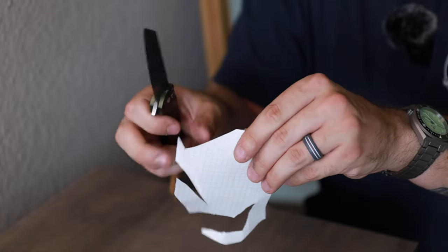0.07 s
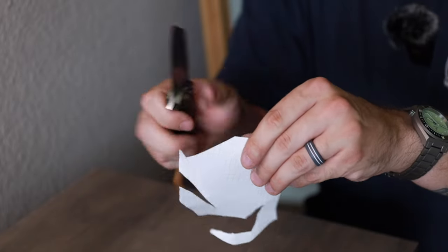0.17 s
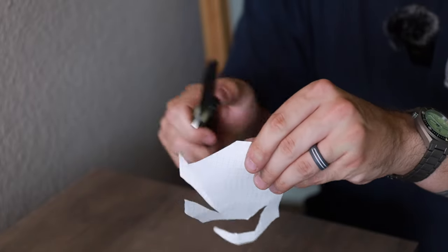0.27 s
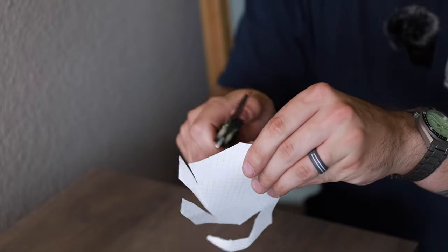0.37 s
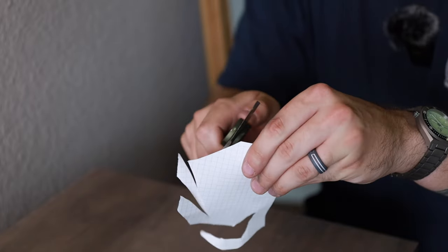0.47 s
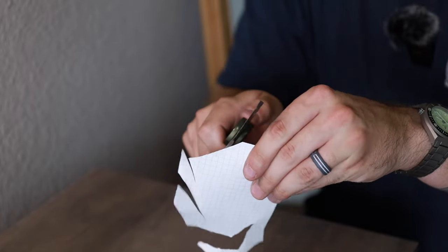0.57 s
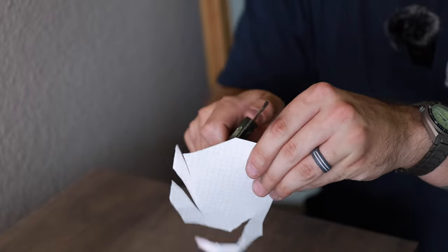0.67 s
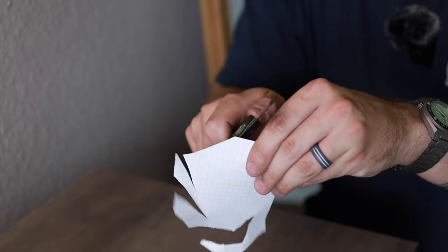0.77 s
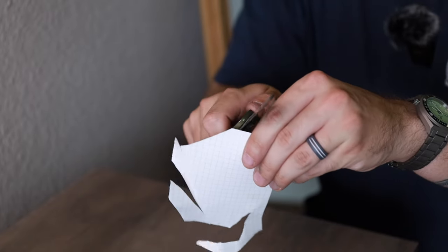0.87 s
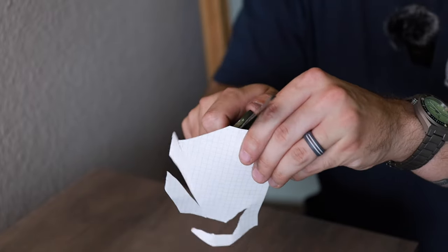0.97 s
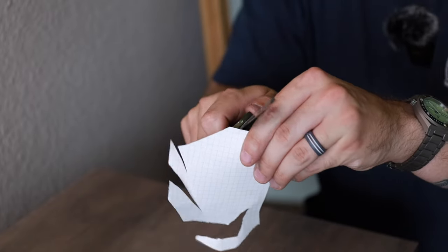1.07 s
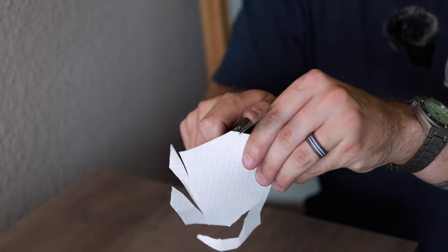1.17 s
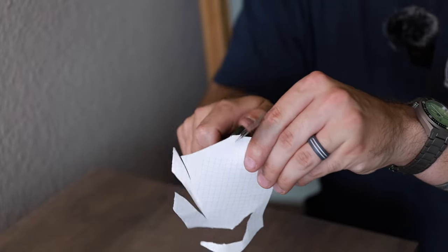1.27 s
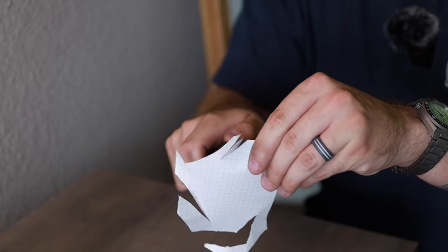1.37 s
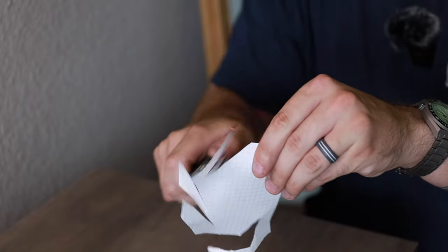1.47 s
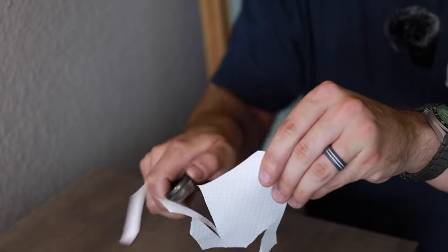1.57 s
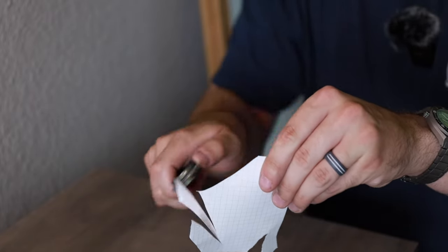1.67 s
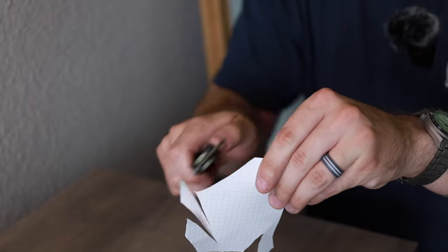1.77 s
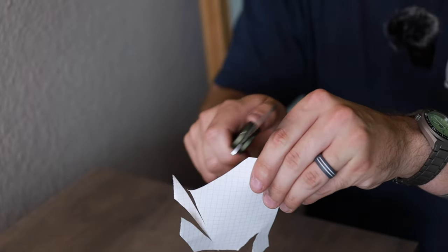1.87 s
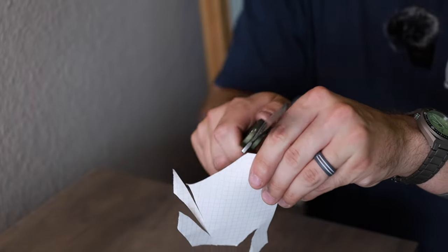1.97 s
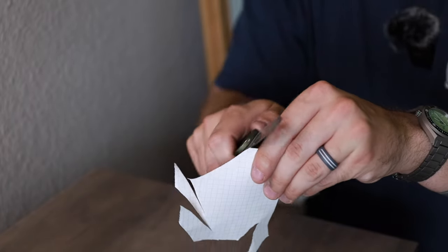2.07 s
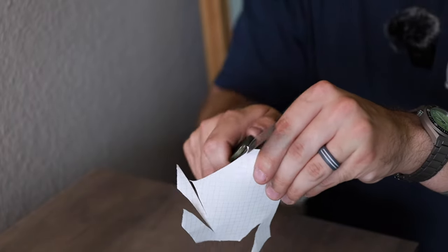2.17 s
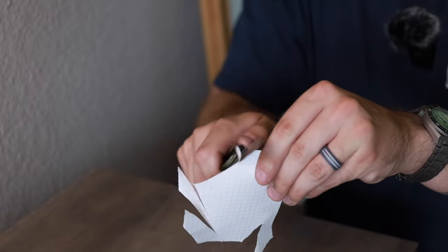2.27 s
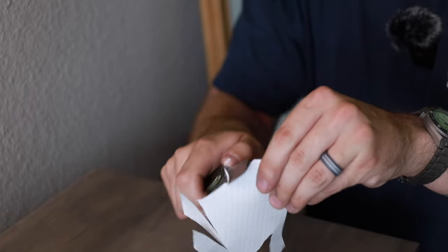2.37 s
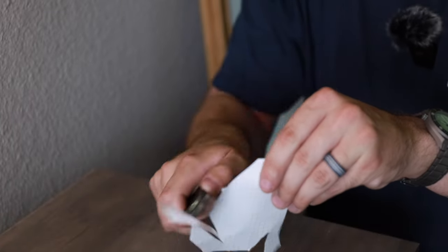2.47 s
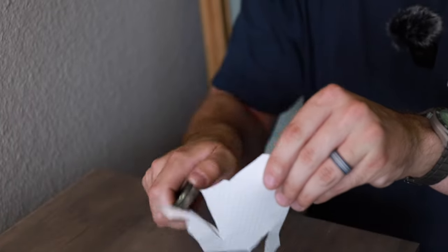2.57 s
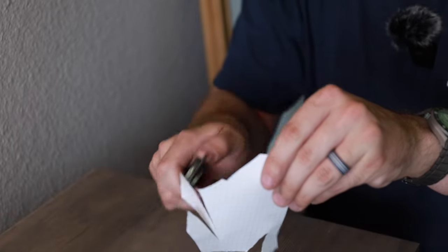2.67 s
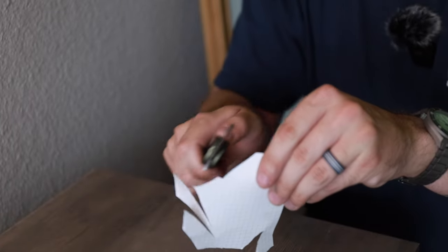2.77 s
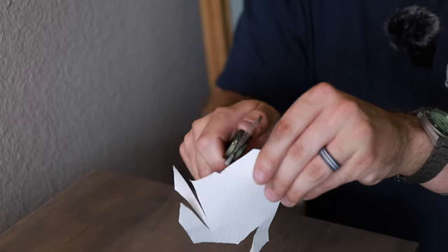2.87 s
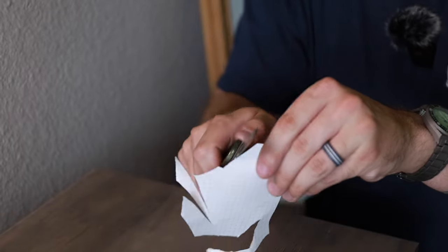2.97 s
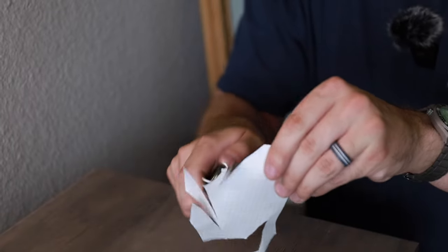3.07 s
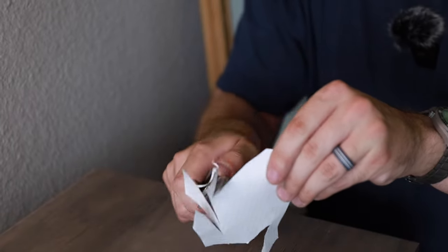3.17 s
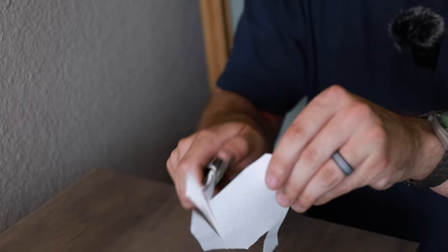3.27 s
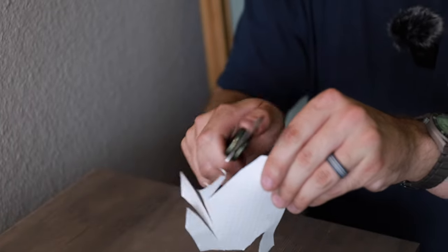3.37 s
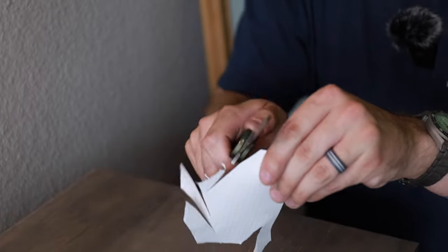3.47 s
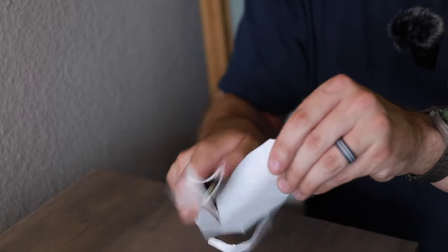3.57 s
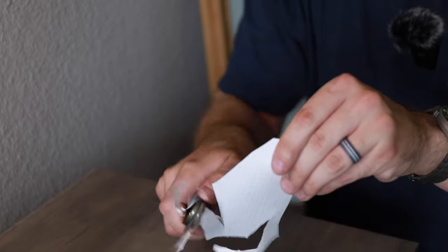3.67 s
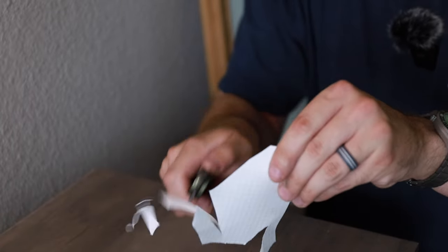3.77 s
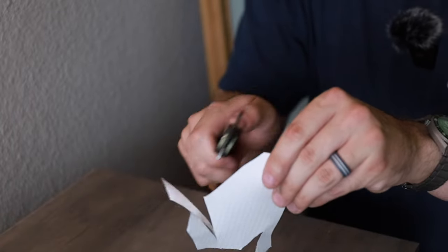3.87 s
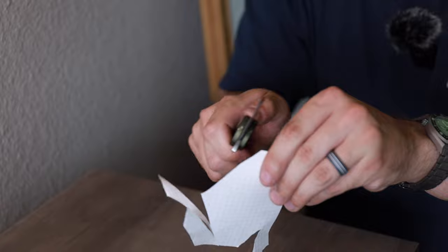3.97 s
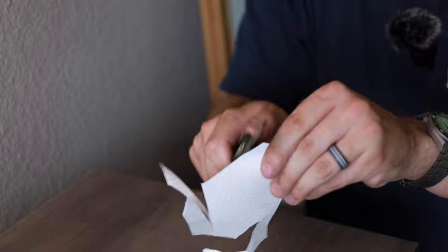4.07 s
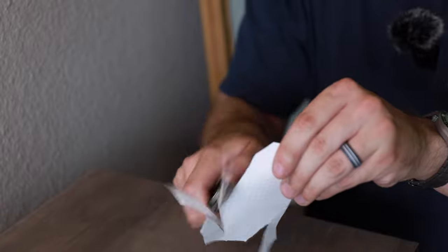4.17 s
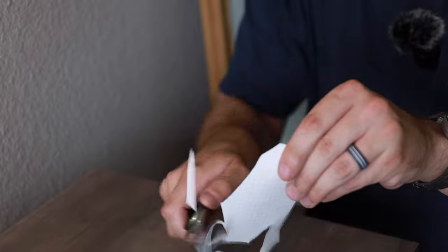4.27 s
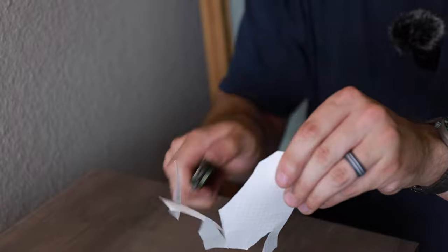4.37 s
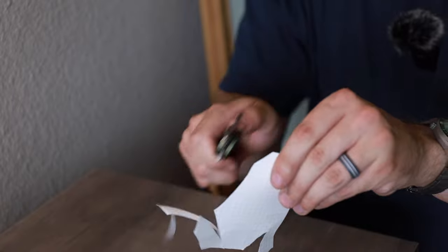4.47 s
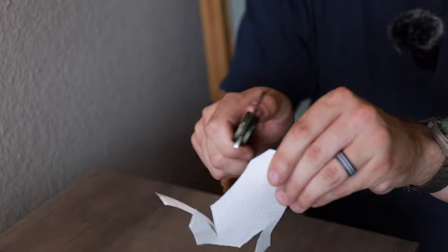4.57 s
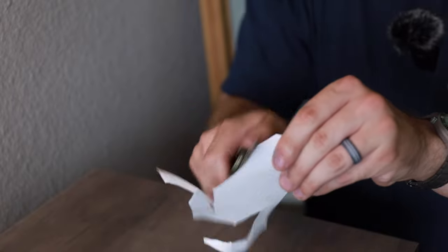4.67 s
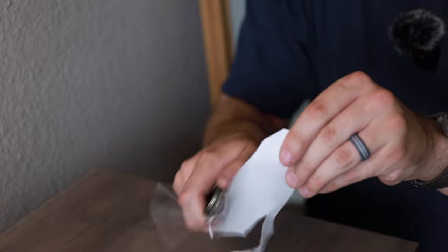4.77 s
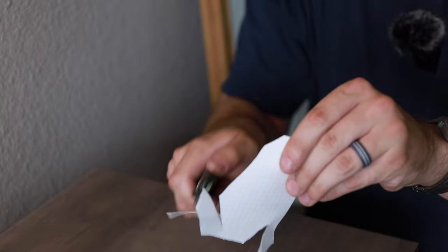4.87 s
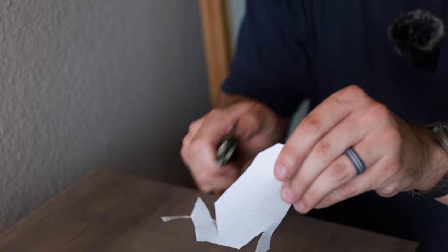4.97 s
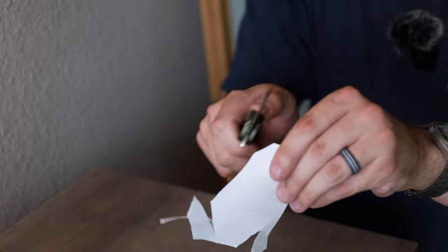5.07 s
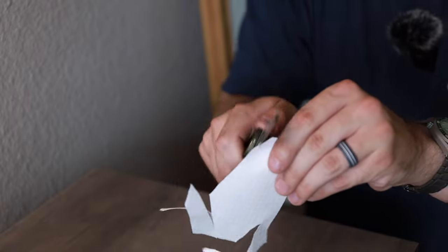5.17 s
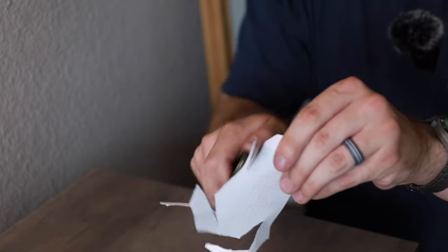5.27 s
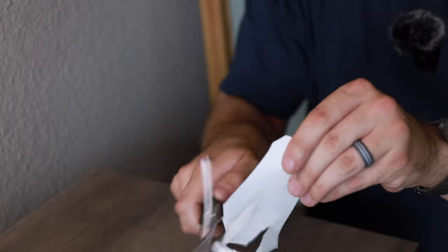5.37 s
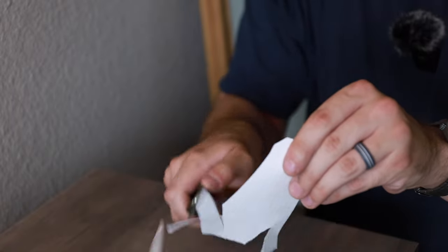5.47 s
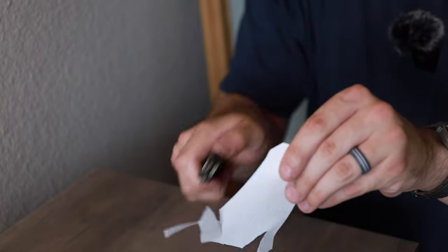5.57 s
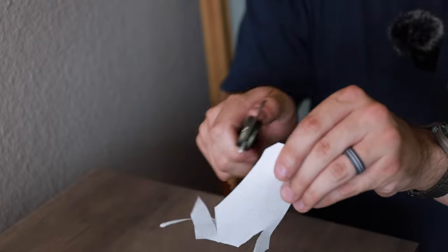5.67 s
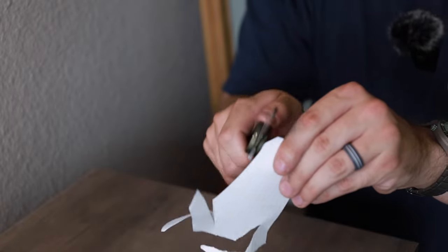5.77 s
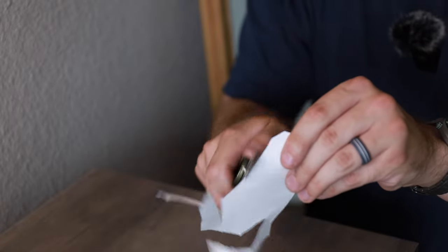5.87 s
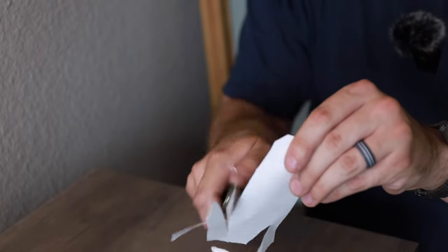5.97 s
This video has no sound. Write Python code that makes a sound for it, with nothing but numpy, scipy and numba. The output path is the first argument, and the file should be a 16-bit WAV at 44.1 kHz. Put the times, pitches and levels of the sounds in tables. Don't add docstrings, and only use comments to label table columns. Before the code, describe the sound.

After faint finger brushes, a knife rips through paper in ten uneven crackling cuts, with freed strips snapping and fluttering over low room rumble.

```python
import sys
import numpy as np
from scipy import signal
from scipy.fft import rfft, irfft
from scipy.io import wavfile
from scipy.ndimage import uniform_filter1d
from numba import njit

SR = 44100
rng = np.random.default_rng(int(sys.argv[2]) if len(sys.argv) > 2 else 0)


def ratio(d):
    e = np.asarray(d, float) / 20
    return 10 ** e


def wrap_up_sound(samples):
    columns = np.atleast_2d(samples).T
    tamed = np.clip(columns, -1, 1)
    steps = np.round(tamed * 32767).astype(np.int16)
    wavfile.write(sys.argv[1], SR, steps)


N = 266055

# (f/Hz, width/Hz, level/dB)
DRUM = [(303, 550, -6), (536, 246, 1.5), (687, 330, 6)]
RASP = [(1084, 570, -8), (1300, 168, 4.5), (1776, 180, 3), (2110, 65, 3.5), (2440, 1100, -7.5)]

# (t/s, crack/dB, crack f/Hz, pop/dB, pop f/Hz)
BITES = [
    (1.1193, -33, 4790, -27.5, 2010),
    (1.1328, -28.5, 7550, -33, 1600),
    (2.15, -30, 5200, -35, 2100),
    (3.027, -36, 4800, -21.5, 2130),
    (3.585, -30, 5230, -16.5, 608),
    (4.129, -30, 3380, -15.5, 580),
    (4.729, -35, 8100, -25.5, 592),
    (5.2324, -33, 5480, -18, 1210),
    (5.870, -34, 3500, -19.5, 540),
]
CATCHES = [(1.5376, -10, 6800, -26, 1300), (2.4266, -16, 6600, -39, 1165), (2.4622, -7, 7200, -8.5, 750),
           (2.492, -18, 6670, -9, 1160), (2.524, -7, 6400, -10.5, 534), (3.609, -14, 4020, -43, 1250),
           (3.624, -13, 5800, -22, 598), (3.634, -20, 5800, -17, 1230), (3.6605, -0.5, 5450, -9.5, 700),
           (4.212, -12, 5830, -28, 1390), (4.2458, -9, 8800, -7, 835), (4.768, -7.5, 5950, -23, 1250),
           (4.807, -2, 4000, -39, 662), (5.405, -6, 7300, -32, 1300), (5.422, -25, 5700, -11.5, 1300),
           (5.966, -13, 3900, -30, 1250)]
FLAPS = [
    (1.6245, -3, 5200, -10.5, 1480),
    (2.597, -18, 5800, -40, 720),
    (2.603, -11, 3720, -8, 1170),
    (3.688, -42, 5200, -19, 1310),
    (3.703, -15, 5200, -10, 1115),
    (4.298, -33, 4000, -11, 1300),
    (4.833, -17.5, 6300, -25, 1300),
    (4.8678, -23, 3100, -22.5, 730),
    (5.448, -14.5, 5130, -13, 730),
]
TICKS = [
    (.0395, -37, 8040, -55, 800),
    (.247, -32.5, 7700, -55, 2000),
    (.455, -27.5, 6000, -34.5, 503),
    (1.803, -31.5, 8200, -30.5, 1850),
    (3.7985, -28, 5100, -25, 750),
    (3.9724, -31.5, 7740, -37.5, 1800),
    (4.357, -30, 3960, -20, 660),
    (4.364, -40, 9500, -35, 1300),
    (4.625, -26, 5130, -31, 1740),
]
TAPS = [
    (.099, -36.5, 5540, -35, 1510),
    (.6615, -18.5, 5800, -23.5, 1200),
    (.991, -47, 5730, -36, 2030),
    (4.4144, -45, 4030, -31.5, 528),
    (4.436, -41, 4140, -60, 1300),
    (4.499, -41, 5990, -32.5, 710),
    (4.612, -36.5, 4770, -52, 1300),
    (4.6494, -39, 3140, -45, 1300),
    (5.6414, -43, 5470, -60, 1300),
]
# (clicks, sizzle/dB above the crack, crack length/s, time for the pop to fall 60 dB/s)
CLICKS = [(BITES, 1, 0.01, 0.14), (CATCHES, -5, 0.0055, 0.027), (FLAPS, -53, 0.0054, 0.09),
          (TICKS, 0.83, 0.0058, 0.033), (TAPS, -10, 0.01, 0.05)]


def unit(x):
    return x / np.sqrt(np.mean(x ** 2))


@njit
def svf(x, hz, width):
    y, b, l = np.empty(len(x)), 0., 0.
    for i in range(len(x)):
        g, k = np.tan(np.pi * hz[i] / SR), width / hz[i]
        v = (b + g * (x[i] - l)) / (1 + g * (g + k))
        b, l, y[i] = 2 * v - b, l + 2 * g * v, k * v
    return y


def steady_band(x, hz, width):
    return svf(x, np.full(len(x), float(hz)), float(width))


def walk(rate):
    k = int(SR / rate)
    steps = np.repeat(rng.standard_normal(N // k + 1), k)
    return 0.986 * uniform_filter1d(uniform_filter1d(steps, k), k)[:N]


def gate(start, end, edge_s):
    t = np.arange(N) / SR
    return np.clip(np.minimum(t - start, end - t) / edge_s + 1, 0, 1) ** 2


def air():
    # (f/Hz, level/dB per Hz)
    air_colour = [(15, -46), (25, -19.5), (117, -8.5), (190, -8.5), (223, -2), (263, -7), (405, -5.5),
                  (560, -10.5), (714, -12.5), (1130, -17), (2990, -26), (4030, -27), (10700, -28.5),
                  (16000, -32)]
    # (t/s, level/dB)
    hum_level = [(0, -58), (1.2, -55), (1.4, -61.5), (6.03, -64)]
    t = np.arange(N) / SR
    hz = np.maximum(np.arange(N // 2 + 1) * SR / N, 1)
    hz_points, db_points = np.transpose(air_colour)
    colour = ratio(np.interp(np.log(hz), np.log(hz_points), db_points))
    low = 1 / (1 + (hz / 900) ** 2)
    rumble = irfft(rfft(rng.standard_normal(N)) * colour * np.sqrt(low), N)
    hiss = irfft(rfft(rng.standard_normal(N)) * colour * np.sqrt(1 - low), N)
    noise = ratio(-48) * unit(ratio(1.3 * walk(7.1)) * rumble + hiss)
    pitch_hz = 119 + 2.18 * walk(5.4)
    hum = np.sqrt(2) * ratio(2.7 * walk(12)) * np.sin(2 * np.pi * np.cumsum(pitch_hz) / SR)
    return noise + ratio(np.interp(t, *np.transpose(hum_level))) * hum


def snaps():
    rise = 0.41
    out, t = np.zeros(N + 2048), np.arange(2048) / SR
    for clicks, sizzle_db, length, _ in CLICKS:
        age = t / max(length, .001) * 3
        fade = (age / rise) ** rise * np.exp(rise - age) * np.exp(-.05 * age ** 2)
        for s, db, hz, _, _ in clicks:
            burst = rng.standard_normal((3, len(t)))
            own_ring = unit(steady_band(burst[0], hz, 1400))
            crack = unit(steady_band(steady_band(burst[1], 4400, 6500), 4400, 6500))
            bright = unit(steady_band(burst[2], 11000, 7000))
            i = int(s * SR)
            out[i:i + len(t)] += ratio(db - 7) * fade * (own_ring + ratio(-10) * crack + ratio(sizzle_db) * bright)
    return out[:N]


def pops():
    lead_s, spread = 0.00199, 3.5
    out, t = np.zeros(N + 4096), np.arange(4096) / SR
    for clicks, _, _, t60 in CLICKS:
        panel_width = np.log(1000) / np.pi / max(t60, .005) * spread
        for s, _, _, db, hz in clicks:
            push = rng.standard_normal(len(t)) * t * np.exp(-t / .0013)
            panel = steady_band(push, hz, panel_width)
            sheet = sum(ratio(g) * steady_band(push, f, 0.4 * w) for f, w, g in DRUM + RASP)
            thump = panel + ratio(-16.5) * sheet
            i = int((s - lead_s) * SR)
            out[i:i + len(t)] += ratio(db) * thump / np.abs(thump).max()
    return out[:N]


def fingers():
    # (t/s, length/s, strongest level/dB, sizzle/dB above the crackle)
    slides = [
        (0.192, 0.043, -52.5, 6.5),
        (.245, 0.024, -52, 5),
        (0.395, .12, -49, -1),
        (0.525, 0.12, -48.5, 2.5),
        (0.678, 0.072, -45.5, 5),
        (0.724, 0.19, -58.5, 3.5),
        (0.976, 0.038, -51.5, -3),
    ]
    squeak_db, fade_db = -4, 10
    t, gain = np.arange(N) / SR, np.zeros((3, N))
    for s, length, db, sizzle_db in slides:
        arc_db = db - fade_db * (2 * (t - s) / length - 1) ** 2
        gain += gate(s, s + length, .012) * ratio(arc_db + np.array([[0], [sizzle_db], [squeak_db]]))
    return gain


def strokes():
    # (t/s, crackle level/dB)
    cuts = [
        [(1.125, -43), (1.285, -27.5), (1.313, -32.5), (1.399, -22), (1.43, -19), (1.481, -20), (1.529, -22.5),
         (1.543, -17.5), (1.578, -18)],
        [(2.147, -33.5), (2.165, -31.5), (2.253, -30), (2.279, -27), (2.309, -26), (2.373, -22), (2.394, -22.5)],
        [(2.45, -28), (2.462, -19), (2.476, -19.5), (2.494, -16)],
        [(3.025, -31), (3.079, -21), (3.101, -22), (3.201, -17.5), (3.211, -20.5), (3.247, -33.5), (3.265, -45)],
        [(3.592, -47), (3.6, -24.5), (3.616, -18.5), (3.641, -28.5)],
        [(3.648, -42), (3.655, -19.5)],
        [(4.128, -27.5), (4.154, -17), (4.188, -14), (4.194, -21.5), (4.258, -16.5)],
        [(4.75, -27.5), (4.764, -20), (4.806, -15), (4.812, -37)],
        [(5.232, -31.5), (5.25, -27), (5.272, -21.5), (5.408, -17), (5.416, -13.5), (5.43, -40)],
        [(5.884, -34), (5.91, -25.5), (5.944, -22), (5.96, -21.5), (6.014, -19), (6.03, -16.5)],
    ]
    # (drum/dB, rasp/dB, sizzle/dB, strip ring at entry f/Hz, edge ring at exit f/Hz)
    grips = [(1, 1.5, 0.5, 2250, 6600), (0.5, 1, -2, 2160, 5800), (3.5, 1.5, 1, 1100, 6500),
             (-1.5, 2.5, 0, 1810, 6600), (2.5, -1, 1.5, 1300, 7400), (11, 6, 13, 1400, 6400),
             (0, -1, 2, 1320, 4950), (2.5, -1.5, 3, 1150, 6400), (-1.5, 0.5, 2, 1140, 5460),
             (-1, 1.5, 1, 1200, 5300)]
    middle_db, follow, mix_db = -23, (0.62, 0.69, 1), (-10, -8, -2.5)
    exit_db = (-0.5, 1, 3)
    edge_entry_hz, strip_free_hz, strip_fall_s = 5420, 1260, 0.165
    t, gain = np.arange(N) / SR, np.zeros((4, N))
    edge_hz, strip_hz = np.full(N, float(edge_entry_hz)), np.full(N, float(strip_free_hz))
    for cut, (*grip_db, strip_entry_hz, edge_exit_hz) in zip(cuts, grips):
        s, pressure_db = np.transpose(cut)
        db = np.interp(t, s, pressure_db)
        done = np.interp(t, s[[0, -1]], [0, 1])
        after = t > s[0] - .02
        levels = [db]
        for share, mix, grip, free in zip(follow, mix_db, grip_db, exit_db):
            levels.append(middle_db + share * (db - middle_db) + mix + grip + free * done)
        gain += gate(s[0], s[-1], 0.005) * ratio(np.array(levels))
        edge_hz = np.where(after, edge_entry_hz + (edge_exit_hz - edge_entry_hz) * done, edge_hz)
        fall = np.exp(-(np.maximum(t - s[0], 0) / strip_fall_s) ** 4)
        strip_hz = np.where(after, strip_free_hz + (strip_entry_hz - strip_free_hz) * fall, strip_hz)
    return gain, edge_hz, strip_hz


def fibres(per_s, scatter_db, judder_db):
    lets_go = rng.random(N) < per_s / SR
    return lets_go * ratio(scatter_db * rng.exponential(size=N) + judder_db * walk(160))


def ring(force, modes, bend, patchy_db):
    out = 0
    for hz, width, db in modes:
        hz, width = hz * (1 + bend * walk(12)), 1.27 * width
        push = force * rng.standard_normal(N)
        out = out + ratio(db + patchy_db * walk(35)) * svf(svf(push, hz, width), hz, width)
    return unit(out)


def sing(force):
    # (t/s, length/s, level/dB, f/Hz)
    whistles = [(1.2, 0.081, -33, 5440), (1.418, 0.043, -32.5, 1247), (1.474, 0.078, -21, 6680),
                (1.53, .03, -25, 3860), (2.15, .105, -35.5, 2140), (2.3, 0.058, -34, 1356),
                (3.08, 0.056, -29, 1257), (3.206, 0.046, -30, 2120), (4.163, 0.033, -20, 5780),
                (4.765, 0.037, -20.5, 5800), (5.255, 0.12, -27.5, 1300), (5.962, .025, -24.5, 4220),
                (5.9, 0.16, -33, 1270)]
    out = 0
    for s, length, db, hz in whistles:
        whistle = ring(force, [(hz, 0.07 * hz, 0)], 0.023, 7.5)
        out = out + ratio(db) * gate(s, s + length, 0.0093) * whistle
    return out


def brushes():
    # (t/s, length/s, first level/dB, last level/dB, slackness/dB)
    flutters = [(1.543, 0.024, -36, -33, 10.5), (3.19, 0.05, -47, -38, 11), (1.622, .06, -41, -53, 7),
                (5.264, 0.077, -46.5, -42, 11), (2.604, 0.027, -40, -51, 7.5),
                (2.652, 0.069, -36, -55, 0.5), (3.275, 0.055, -49, -44, -1), (3.341, 0.028, -42, -57, 0),
                (3.66, 0.048, -62, -38, 1), (3.702, 0.048, -33, -50, 8.5), (4.277, 0.029, -36, -42, 1),
                (4.3, .012, -29.5, -45, 2), (4.322, 0.049, -60, -46, -1), (4.738, 0.027, -42.5, -44, -0.5),
                (4.811, 0.019, -37, -35.5, 6.5), (4.833, 0.085, -31, -57, 4), (5.428, 0.022, -33, -23.5, 1),
                (5.465, 0.077, -41, -56, 2.5), (2.529, 0.059, -36, -45, -4.5)]
    slack_shares, mix_base_db = (0.34, 1.7, -.6), (-3, -3.5, -1.5)
    t, gain = np.arange(N) / SR, np.zeros((4, N))
    for s, length, first_db, last_db, slack_db in flutters:
        mix_db = np.r_[0, np.add(mix_base_db, np.multiply(slack_shares, slack_db))]
        db = np.interp(t, [s, s + length], [first_db, last_db])
        gain += gate(s, s + length, 0.012) * ratio(db + mix_db[:, None])
    return gain


def rub():
    # (f/Hz, width/Hz, level/dB)
    crackle_modes = [(3780, 790, 5), (4180, 2500, 0.5), (5800, 1530, 6), (6870, 570, 1.5), (7400, 540, 6)]
    sizzle_modes = [(8600, 1640, 0), (9730, 570, 2.5), (11000, 580, 0), (12060, 1840, -4.5),
                    (13700, 1600, -14), (14200, 2600, -5)]
    cutting, edge_hz, strip_hz = strokes()
    force = fibres(per_s=7000., scatter_db=0.72, judder_db=1.2)
    crackle = ring(force, crackle_modes + [(edge_hz, 500, 3)], 0.061, 3.26)
    sizzle = ring(force, [(hz, 1.9 * width, db) for hz, width, db in sizzle_modes], 0.028, 2.3)
    drum = ring(force, DRUM, 0.05, 2.7)
    rasp = ring(force, RASP + [(strip_hz, 200, 3)], 0.043, 5.0)
    squeak = ring(force, [(1890, 630, 0)], 0.023, 3.2)
    flutter = ring(force, [(hz, 1.62 * width, db) for hz, width, db in RASP], 0.11, 3.2)
    blade = np.sum(cutting * [crackle, drum, rasp, sizzle], axis=0)
    strips = np.sum(brushes() * [crackle, drum, flutter, sizzle], axis=0)
    skin = np.sum(fingers() * [crackle, sizzle, squeak], axis=0)
    return sing(force) + blade + strips + skin


def walls(x):
    t60_s, treble_t60_s = 0.35, 0.12
    t = np.arange(SR // 2) / SR
    echo = rng.standard_normal(len(t)) * np.clip((t - .003) / 0.013, 0, 1)
    low = signal.sosfilt(signal.butter(1, 3500, fs=SR, output="sos"), echo)
    echo = low * ratio(-60 * t / t60_s) + (echo - low) * ratio(-60 * t / treble_t60_s)
    return signal.fftconvolve(x, echo / np.sqrt(np.sum(echo ** 2)))[:N]


def scene():
    paper = rub() + snaps() + pops()
    return (paper + ratio(-14.5) * walls(paper) + air())[None]


def roll_off(x):
    return signal.sosfilt(signal.butter(12, 16190, fs=SR, output="sos"), x)


def record(dry):
    dry = signal.sosfilt(signal.butter(2, 30, "high", fs=SR, output="sos"), dry)
    mix = np.clip(dry, -1, 1)
    return roll_off(mix)


dry = scene()
out = record(dry)
wrap_up_sound(out)
```